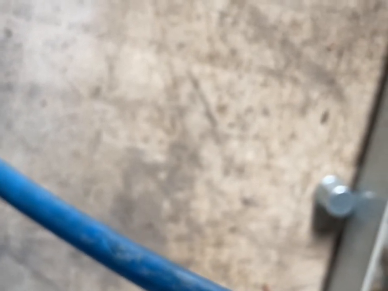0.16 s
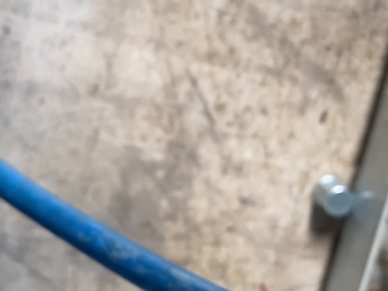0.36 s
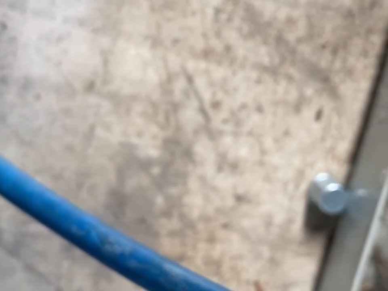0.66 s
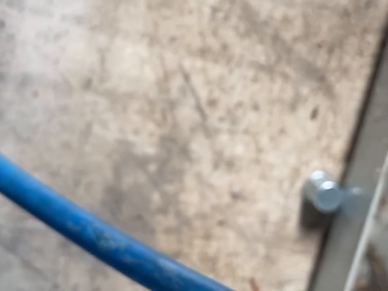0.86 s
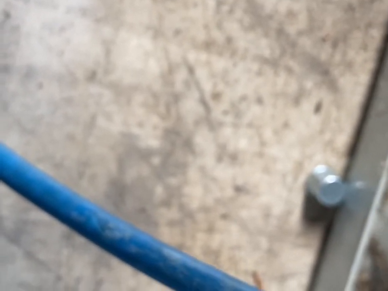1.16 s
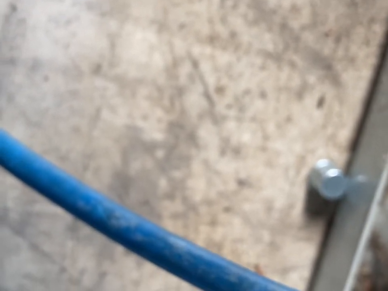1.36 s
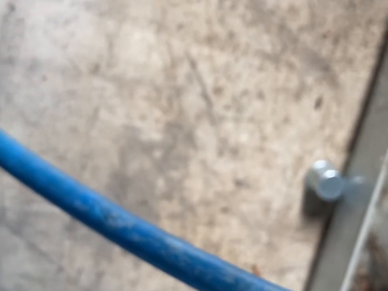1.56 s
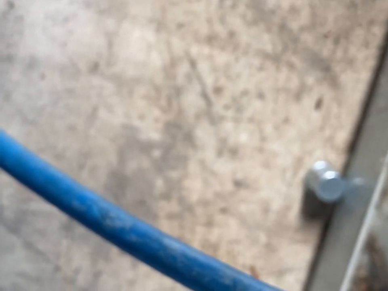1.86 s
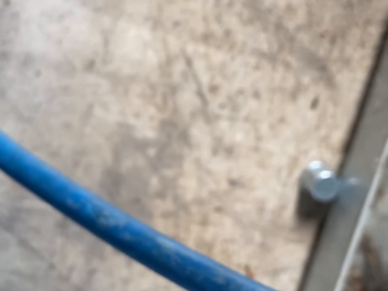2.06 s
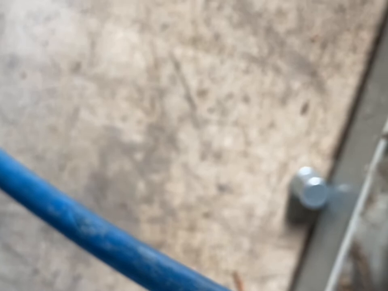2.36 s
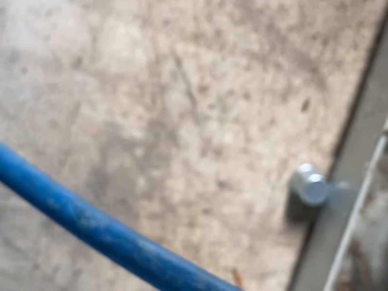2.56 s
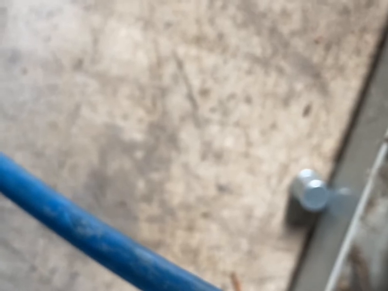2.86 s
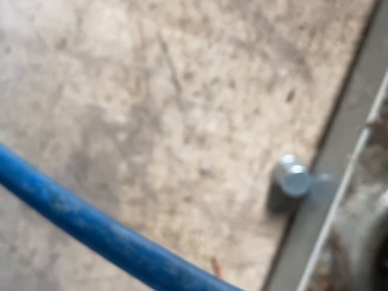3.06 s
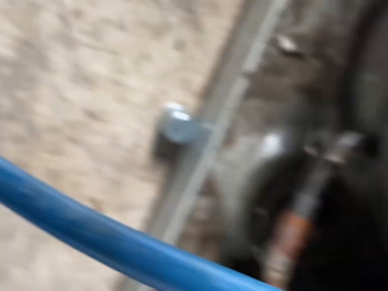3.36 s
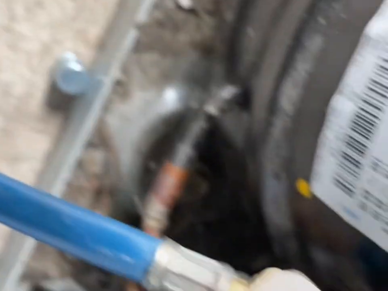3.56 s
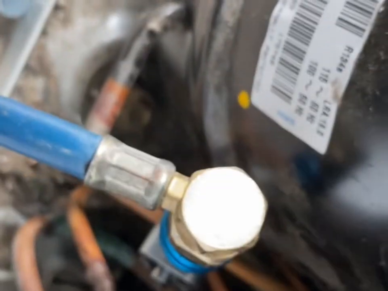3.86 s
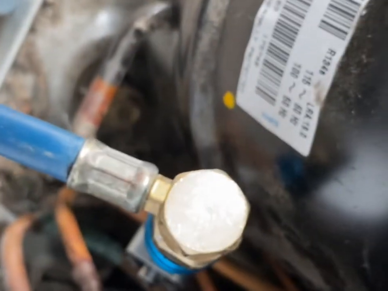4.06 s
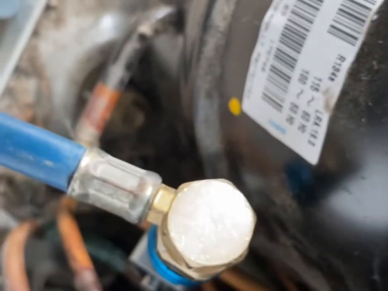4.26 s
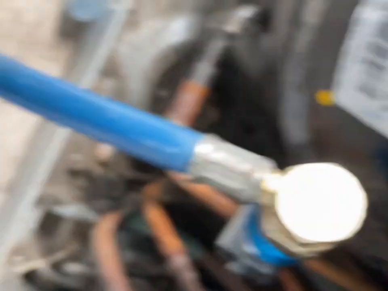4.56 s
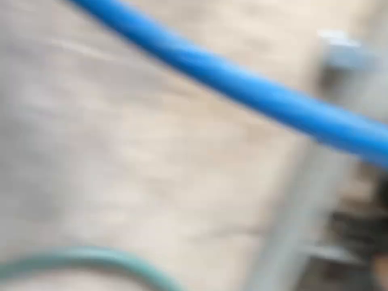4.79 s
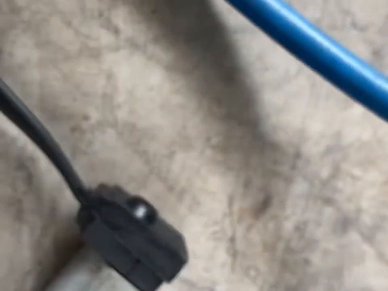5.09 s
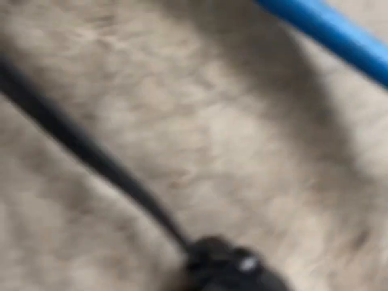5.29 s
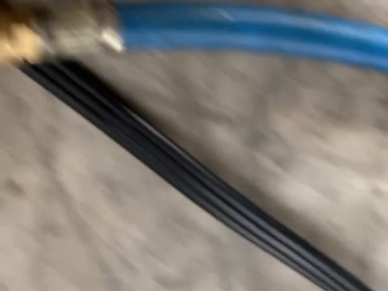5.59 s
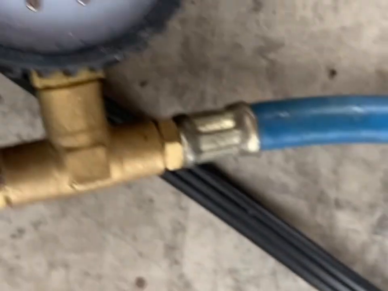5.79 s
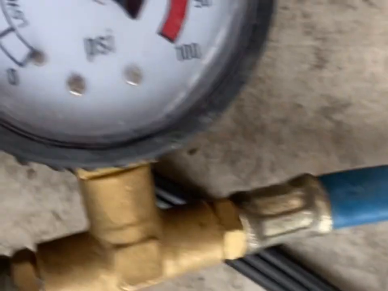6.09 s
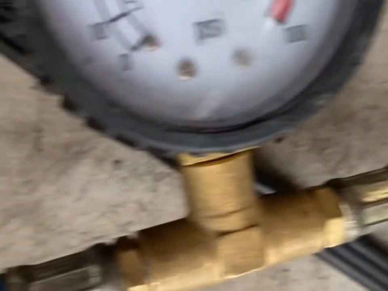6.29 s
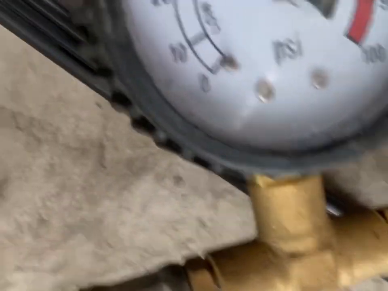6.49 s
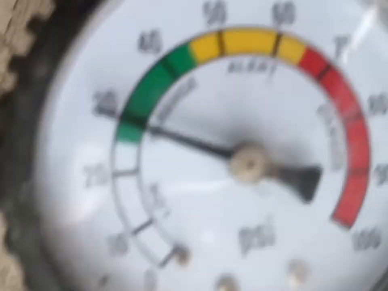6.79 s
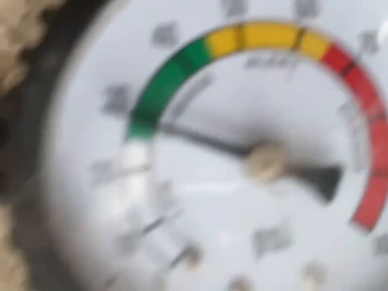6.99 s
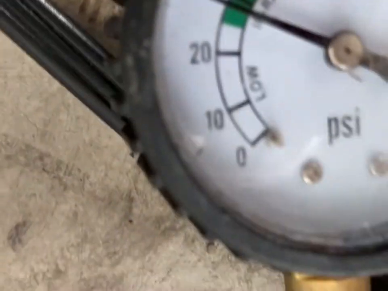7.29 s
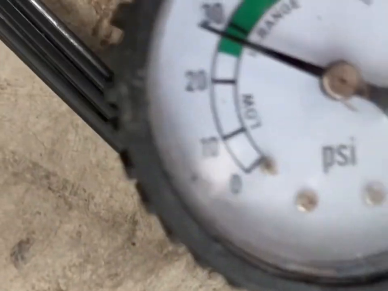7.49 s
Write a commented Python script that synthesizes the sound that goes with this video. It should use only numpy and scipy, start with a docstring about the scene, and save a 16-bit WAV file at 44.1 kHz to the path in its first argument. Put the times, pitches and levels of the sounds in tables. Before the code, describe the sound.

A low compressor hum holds throughout in a hard-floored indoor space, with whirring fan air and fine metallic rattle. Refrigerant rushes through a nearby hose with a high whistling edge, strongest at first. A short squeak is followed by a quiet fitting knock. The handheld microphone then moves away with a dull bump and clicks; thin metallic whistles flicker, hiss drops, and faint low draught brushes the microphone.

```python
"""A compressor drones and buzzes while refrigerant hisses in through a charging hose; a small fan whirs behind.
The drone is a shaft-rate sine; piston strokes ring steel resonances; the motor hum beats. Fan and gas are
coloured noise plus blurred tones or a singing band. A rub squeaks briefly and a fitting is tapped.
A hand-held camera moves from the hose past the compressor to the gauge; levels, ripples and draught follow tables."""
import sys
import numpy as np
from scipy import signal
from scipy.fft import rfft, irfft, next_fast_len
from scipy.io import wavfile
from scipy.ndimage import map_coordinates

SR = 44100
rng = np.random.default_rng(int(sys.argv[2]) if len(sys.argv) > 2 else 0)


def to_wav(s):
    """Save 16-bit WAV."""
    ch = np.atleast_2d(s).T  # columns
    pcm = np.round(np.clip(ch, -1, 1) * 32767)  # PCM
    wavfile.write(sys.argv[1], SR, pcm.astype(np.int16))


N = 336924
SHAFT_HZ = 59.69

# Likeness of the two microphone ports for low and mid sounds: (frequency [Hz], correlation [-1..1])
PORT_LIKENESS = [(60, 1), (250, 1), (450, 0.9), (700, 0.71), (1300, 1), (3000, 0.93), (9000, 1)]


def amp(db):
    """Decibels to gain."""
    return 10 ** (np.asarray(db) / 20)


def unit(x):
    """Scale to rms 1."""
    return x / np.sqrt(np.mean(x ** 2) + 1e-20)


def along(points, hz):
    """Interpolate (Hz, value) points on a log frequency axis."""
    f, v = np.transpose(points)
    return np.interp(np.log(hz + 1), np.log(np.abs(f) + 1), v)


def clock():
    """The time of every sample in seconds."""
    return np.arange(N) / SR


def curves(rows):
    """One value per sample for each column after the time."""
    s, *cols = np.transpose(rows)
    return [np.interp(clock(), s, c) for c in cols]


def wobble(rate_hz):
    """A smooth random curve through normal knots, rate_hz of them a second."""
    knots = rng.standard_normal(int(N * rate_hz / SR) + 4)
    return map_coordinates(knots, [clock() * rate_hz])


def filtered(x, response):
    """x times a complex response of frequency."""
    m = next_fast_len(N + SR // 2)
    spectrum = rfft(x, m) * response(np.fft.rfftfreq(m, 1 / SR))
    return irfft(spectrum, m)[..., :N]


def tone(hz, drift_rad):
    """A sine of rms 1 whose phase wanders slowly."""
    return np.sqrt(2) * np.sin(2 * np.pi * (hz * clock() + rng.random()) + drift_rad * wobble(1.95))


def blurred(hz, width_hz):
    """A tone of rms 1, part steady, part fluttering in strength and phase at about width_hz."""
    steady_share = .45  # of the power
    flutter = unit(wobble(width_hz)) + 1j * unit(wobble(width_hz))
    envelope = np.sqrt(steady_share) + np.sqrt((1 - steady_share) / 2) * flutter
    return unit(np.real(envelope * np.exp(2j * np.pi * hz * clock())))


def rush(spectrum, likeness):
    """Stereo noise of rms 1 with a given colour and left-right correlation."""
    def colour(hz):
        turn = np.arccos(np.clip(along(likeness, hz), -1, 1)) / 2
        return amp(along(spectrum, hz)) * [np.cos(turn), np.sin(turn)]
    mid, side = filtered(rng.standard_normal((2, N)), colour)
    return unit(np.array([mid + side, mid - side]))


def ring(x, modes):
    """x through parallel resonances of alternating sign, at rms 1."""
    def band(f, hz, width):
        return 1j * f * width / (hz * hz - f * f + 1j * f * width)

    def bank(f):
        return sum((-1) ** k * amp(db) * band(f, hz, width) for k, (hz, width, db) in enumerate(modes))
    return unit(filtered(x, bank))


def gate(start_s, length_s, attack_s, release_s):
    """An envelope that rises, holds until the length has passed, then falls."""
    t = clock() - start_s
    return np.clip(t / attack_s, 0, 1) * np.clip(1 - (t - length_s) / release_s, 0, 1)


def level(near_db, far_db):
    """A source's level in dB as the camera moves from the cabinet to the gauge."""
    # Camera path: (time [s], place [0 beside the cabinet .. 1 beside the gauge])
    camera = [(0, 0.083), (3, 0.17), (3.6, 0.027), (4.6, 0.037), (5.2, 0.72), (6.9, 1), (7.64, 0.9)]
    away, = curves(camera)
    return near_db + (far_db - near_db) * away


def rippled(x, depth_db, spacing_hz, glide_hz, size):
    """Reflections from floor and cabinet: spectral peaks and dips that change and slide upward."""
    # Pace of the ripples as the hand moves: (time [s], rate [changes/s])
    ripple_rate = [(0, .4), (3, .5), (3.4, 3), (4.5, 2), (4.8, 5), (7.64, 4)]
    hz, t, z = signal.stft(x, SR, nperseg=size)
    travel = np.cumsum(np.interp(t, *np.transpose(ripple_rate))) * t[1]
    place = np.broadcast_arrays((hz[:, None] - glide_hz * travel) / spacing_hz, travel)
    field = map_coordinates(rng.standard_normal((256, 64)), place, mode="mirror")
    gain = unit(amp(depth_db * unit(field)))
    return signal.istft(z * gain, SR, nperseg=size)[1][..., :N]


def draught():
    """Air brushing each port: faint low noise, nearly unrelated left and right."""
    # Draught level: (time [s], level [dB])
    draught_level = [(4.5, -91), (4.7, -66), (5.5, -55), (6.5, -59.5), (7.1, -46.5), (7.64, -52)]
    # Draught spectrum: (frequency [Hz], relative density [dB/Hz])
    draught_colour = [(15, -15), (35, -3.5), (70, -6), (110, -4), (180, -11), (300, -30), (700, -66)]
    db, = curves(draught_level)
    return amp(db + 2 * wobble(8.7)) * rush(draught_colour, [(100, 0.0056)])


def blade_tones():
    """Tones of the fan and its motor, blurred by turbulent air."""
    # Fan tones: (frequency [Hz], width [Hz], level beside cabinet [dB], level beside gauge [dB])
    fan_tones = [(151.1, 14, -54.5, -62), (199.7, 17, -53.5, -63), (217, 18, -56, -64),
                 (260.5, 5, -58.5, -55), (286.3, 16, -64.5, -65), (356.6, 18, -76, -60.5),
                 (384.6, 16, -66, -66.5), (403.3, 10, -58, -68.5), (436, 16, -64, -67), (454, 24, -63, -77),
                 (582.5, 18, -69.5, -67.5), (631, 24, -74, -69)]
    return sum(amp(level(near, far)) * blurred(hz, width) for hz, width, near, far in fan_tones)


def standing_tones():
    """Two tones that swell and fade as the camera crosses the room's standing waves."""
    # Standing-wave levels: (time [s], low tone [dB], high tone [dB])
    standing = [(0, -51, -67), (.45, -56, -67), (.7, -47.5, -67), (1.4, -46.5, -66), (1.65, -51, -67),
                (2.1, -47, -66), (2.8, -50, -65), (3.4, -47, -62), (4, -47.5, -61), (4.65, -46, -62),
                (4.85, -47, -72), (5.2, -55, -73), (5.6, -58, -63), (6.4, -59, -65.5), (6.8, -54, -60),
                (7.2, -55, -66), (7.64, -55, -66)]
    low_db, high_db = curves(standing)
    low = amp(low_db + 1.8 * wobble(16)) * tone(175.6, drift_rad=.5)
    return low + amp(high_db) * blurred(604, width_hz=24)


def cabinet_boom():
    """The cabinet booms near 180 Hz: noise passed twice through one resonance."""
    # Cabinet resonance: (frequency [Hz], width [Hz], relative level [dB])
    cabinet = [(177, 40, 0)]
    # Boom level: (time [s], level [dB])
    boom = [(0, -51), (.4, -56), (.6, -48), (1.45, -48.5), (1.65, -54), (1.85, -47.5), (2.2, -45),
            (2.35, -52), (3.25, -50.5), (3.5, -45), (3.8, -50), (4.35, -48), (4.75, -50), (5.1, -62),
            (7.64, -62)]
    db, = curves(boom)
    return amp(db) * ring(ring(rng.standard_normal(N), cabinet), cabinet)


def fan_air():
    """Air noise: low rumble, direct whir and its spread through the room."""
    # Spectra of rumble, whir and room sound, each: (frequency [Hz], relative density [dB/Hz])
    rumble_colour = [(15, -4), (30, -32), (52, 2.5), (80, 2), (125, -6.5), (185, -4), (230, -8), (300, -15),
                     (600, -48.5)]
    whir_colour = [(120, -26), (280, -2.5), (345, -4.5), (440, 0.5), (540, -2), (620, -8), (710, -9.5),
                   (930, -8.5), (1150, -14.5), (1600, -17), (2400, -18.5), (4500, -20), (9000, -48),
                   (16000, -24.5)]
    room_colour = [(25, -5), (70, 13), (140, 1.5), (220, -8.5), (350, 0.5), (500, -7), (610, -5), (720, -8),
                   (950, -9.5), (1300, -15), (1700, -18), (2300, -22.5), (6000, -21.5), (16000, -18)]
    # Likeness of the room sound at the ports: (frequency [Hz], correlation [-1..1])
    diffuse = [(60, 1), (250, 0.98), (550, 0.52), (850, -0.15), (1350, -0.38), (1900, -0.0016), (6000, 1)]
    # Air levels: (time [s], direct whir [dB], room sound [dB])
    air_levels = [(0, -50, -58), (1.5, -50.5, -55.5), (2.1, -51, -52.5), (3.4, -50, -55.5),
                  (3.85, -50.5, -54), (4.65, -51, -53), (4.9, -52, -49), (5.55, -55, -45.5),
                  (5.95, -54, -45.5), (7.1, -60, -45), (7.64, -51.5, -45.5)]
    whir_db, room_db = curves(air_levels)
    rumble_db = level(near_db=-42.0, far_db=-45.0) + 0.4 * wobble(7.8)
    rumble = amp(rumble_db) * rush(rumble_colour, PORT_LIKENESS)
    whir = amp(whir_db + 0.8 * wobble(7)) * rush(whir_colour, PORT_LIKENESS)
    room = amp(room_db) * rush(room_colour, diffuse)
    return rumble + rippled(whir + room, depth_db=2.2, spacing_hz=24, glide_hz=22, size=4096)


def fan():
    """Fluttering tones over rushing air; the boom fades late on as the room sound rises."""
    return blade_tones() + standing_tones() + cabinet_boom() + fan_air()


def click(start_s, db):
    """A dry contact: a burst of mid-range noise that dies at once."""
    decay_s = .012
    t = clock() - start_s
    colour = [(300, -20), (900, -2), (1700, 0), (4500, -5), (6500, -14), (9000, -50)]
    return amp(db) * (t > 0) * np.exp(-np.abs(t) / decay_s) * rush(colour, [(1000, 0.93)])


def handling():
    """Dull scuffs (noise swells) and light clicks as the hose and gauge are handled."""
    # Scuffs: (centre time [s], 1/e half-length [s], level [dB], spectral peak [Hz])
    scuff_rows = [(4.615, .02, -42, 130), (4.64, 0.036, -61, 900), (7.295, 0.05, -61.5, 1700),
                  (7.275, .025, -57, 500), (7.445, .012, -64, 1800)]
    # Clicks and creaks: (time [s], onset level [dB])
    ticks = [(4.5, -57), (4.583, -58), (4.705, -57), (4.99, -54), (5.598, -57), (6.56, -58), (7.255, -62)]

    def scuff(s, length_s, db, hz):
        swell = np.exp(-((clock() - s) / length_s) ** 2)
        colour = [(hz / 4, -18), (hz, 0), (hz * 2, -13), (hz * 6, -36), (hz * 20, -80)]
        return amp(db + 1.8 * wobble(150)) * swell * rush(colour, PORT_LIKENESS)
    return sum(scuff(*row) for row in scuff_rows) + sum(click(s, db) for s, db in ticks)


def tap(start_s, db, attack_s, crack_db):
    """A soft knock cracks against a hose fitting and rings its decaying modes."""
    # Fitting modes: (frequency [Hz], relative level [dB], 60 dB decay time [s])
    fitting = [(740, -3, .15), (1224, 2, 0.21), (1310, -2, .05), (1400, -2.5, .25), (1700, -2, .04),
               (2200, -14, 0.17), (2600, -2, 0.066), (2864, -14, .15), (3880, -8, .06)]
    t = np.maximum(clock() - start_s, 0)
    modes = sum(amp(mode_db - 60 * t / t60_s) * np.sin(2 * np.pi * hz * t + .5 * wobble(120))
                for hz, mode_db, t60_s in fitting)
    return amp(db) * (1 - np.exp(-t / attack_s)) * modes + click(start_s, crack_db)


def squeak():
    """A rub catches three times: a shaky tone with a weak octave, broken each time the grip slips."""
    # Catches: (time [s], length [s], mean pitch [Hz], peak level [dB], octave re fundamental [dB])
    catches = [(2.06, .044, 918, -49.5, -26), (2.106, .034, 908, -52.7, -21),
               (2.139, .036, 920, -51.2, -14)]

    def catch(s, length_s, hz, db, octave_db):
        phase = 2 * np.pi * np.cumsum(hz * (1 + .007 * wobble(160))) / SR
        wave = np.sin(phase) + amp(octave_db) * np.sin(2 * phase)
        envelope = gate(s, length_s, attack_s=.008, release_s=.012)
        return envelope * amp(db + 1.2 * wobble(130)) * wave
    return sum(catch(*row) for row in catches)


def singing():
    """A narrow band of valve turbulence, drifting in pitch: low noise shifted up by a carrier."""
    # Singing band: (time [s], centre [Hz], level [dB])
    singing_band = [(0, 12950, -44.5), (.3, 12920, -49.5), (.8, 12900, -59), (3.0, 12800, -63),
                    (3.55, 12850, -62), (3.7, 13500, -57), (4.6, 13480, -55), (4.75, 13600, -64),
                    (5.0, 13600, -63), (5.25, 13900, -59), (5.6, 14100, -70), (7.64, 13500, -72)]
    centre_hz, db = curves(singing_band)
    phase = 2 * np.pi * np.cumsum(centre_hz) / SR
    skirt = [(150, -3.5), (350, -7), (700, -9), (1500, -36), (3000, -120)]
    band = sum(rush(skirt, [(100, 0.87)]) * wave(phase) for wave in (np.cos, np.sin))
    return amp(db + .8 * wobble(7.4)) * band


def bore_spectrum():
    """Resonant peaks of the valve's bore over a noise floor, as (Hz, dB per Hz) points."""
    # Bore resonances: (frequency [Hz], 1/e half-width of power [Hz], relative level [dB])
    bore_modes = [(6500, 330, -5), (7191, 181, -1), (7780, 235, -1), (8599, 350, -1), (9143, 106, 0),
                  (9512, 290, -1), (10419, 202, -3), (11086, 165, -1), (11650, 300, -8), (12248, 131, -6),
                  (12859, 450, -1), (14566, 300, -7), (15269, 327, 0), (15680, 110, 0)]
    # Noise between them: (frequency [Hz], relative density [dB/Hz])
    bore_floor = [(1500, -28), (3700, -14.5), (5000, -9), (5900, -10), (9000, -8.5), (14000, -8.5),
                  (15800, -9), (16500, -60)]
    hz = np.geomspace(1000, SR / 2, 900)
    peaks = sum(amp(db) ** 2 * np.exp(-((hz - centre) / width) ** 2) for centre, width, db in bore_modes)
    return np.column_stack([hz, 10 * np.log10(peaks + amp(along(bore_floor, hz)) ** 2)])


def refrigerant():
    """Near the hose the bore colours the hiss; farther off a plain rush, fizz and room echo remain."""
    # Gas levels: (time [s], bore [dB], plain hiss [dB], top fizz [dB], room echo [dB])
    gas = [(0.0, -40.5, -44, -70, -66), (0.15, -42.5, -48, -70, -66), (0.8, -45, -52, -70, -64),
           (1.5, -45.5, -56, -68, -62), (2.6, -46, -55, -61, -60), (3.1, -47, -51.5, -58, -59),
           (3.4, -51, -47.5, -56, -58), (3.8, -58, -46.5, -59, -59), (4.55, -64, -47, -63, -60),
           (4.72, -64, -51, -58, -59), (4.9, -68, -54, -50.5, -55), (5.2, -62, -54, -52.5, -59),
           (5.65, -66, -64, -63, -56), (6.4, -75, -72, -70, -56.5), (6.9, -68, -75, -66, -61),
           (7.64, -70, -63, -63, -65)]
    # Spectra of hiss, fizz and echo, each: (frequency [Hz], relative density [dB/Hz])
    hiss_colour = [(1500, -25), (3700, -14), (5000, -9), (6000, -5), (7000, 0), (7900, 0), (9400, 0),
                   (10300, -2), (11500, -5), (12500, -4), (14200, -1.5), (15800, 1), (16500, -60)]
    fizz_colour = [(9000, -35), (12500, -16), (13500, -6), (14300, -4), (15200, 0), (15800, 1),
                   (16300, -60)]
    echo_colour = [(3000, -12), (5000, -5), (6100, 1.5), (7000, -4), (7900, 0), (9400, -.5), (10300, 0),
                   (11500, -2.5), (12700, 0), (14200, -2), (15700, 2.5), (16300, -60)]
    # Likeness of the hiss at the ports: (frequency [Hz], correlation [-1..1])
    direct = [(5000, .97), (6500, .78), (7100, .998), (8800, .998), (10500, .75), (12000, .998),
              (13800, .998), (15000, .75)]
    bore_db, hiss_db, fizz_db, echo_db = curves(gas)
    near = amp(bore_db) * rush(bore_spectrum(), direct) + singing()
    parts = [(hiss_db, hiss_colour), (fizz_db, fizz_colour), (echo_db, echo_colour)]
    far = sum(amp(db) * rush(colour, direct) for db, colour in parts)
    swept = rippled(far, depth_db=1.4, spacing_hz=420, glide_hz=400, size=1024)
    both = rippled(near + swept, depth_db=1.7, spacing_hz=110, glide_hz=60, size=2048)
    return both * amp(.35 * wobble(20))


def motor_hum(drift_rad):
    """Rotor slip sets the shaft orders just below the mains orders, so the hum beats slowly."""
    mains_hz, in_step_s = 59.99, 3.98  # in_step_s: a crest of the beat
    # Hum orders beside the cabinet: (multiple, mains order [dB], shaft order [dB])
    magnetic = [(2, -56.5, -67), (4, -53, -59)]

    def order(hz):
        return np.sqrt(2) * np.sin(2 * np.pi * hz * (clock() - in_step_s) + drift_rad * wobble(1.72))
    hum = sum(amp(mains_db) * order(k * mains_hz) + amp(shaft_db) * order(k * SHAFT_HZ)
              for k, mains_db, shaft_db in magnetic)
    return amp(level(near_db=0, far_db=-4.5)) * hum


def strokes(rough, scatter_db, puff_turns):
    """One valve slap and one decaying puff of turbulent gas per shaft turn, spread by the steel."""
    turns = SHAFT_HZ * clock() + 0.0018 * wobble(3.06)
    slap = np.sinc((turns - np.round(turns)) * SR / SHAFT_HZ / 2) * amp(scatter_db * wobble(40))
    puff = np.exp(-(turns % 1) / puff_turns) * rush([(1000, 0)], [(1000, 0.52)])

    def steel(hz):
        colour = amp(along([(800, -25), (2500, 12.0), (6000, 15.5), (9000, -41.0)], hz))
        # bending waves travel faster the higher they are, which spreads each slap in time
        return colour * np.exp(-2j * np.pi * 2.5 * np.sqrt(hz))
    return filtered(unit(slap) + rough * unit(puff), steel)


def shell_buzz():
    """Strokes ring the steel shell: a broad buzz plus a beamed pair of resonances near 3.2 kHz."""
    # Shell resonances: (frequency [Hz], width [Hz], relative level [dB])
    shell = [(2070, 40, -13), (2334, 30, -11), (2770, 30, -8), (2840, 36, -4), (2880, 30, -7),
             (3035, 45, -9), (3470, 60, -13.5), (4010, 43, -8.5), (4144, 40, -6.5), (4725, 44, -4.5),
             (4930, 45, -6), (4970, 43, -5), (5300, 47, -5), (5630, 50, -3)]
    # Level of the 3.2 kHz pair: (time [s], level [dB])
    middle_ring = [(0.0, -65), (3.53, -64.5), (3.76, -76), (4.2, -68), (5.04, -71), (5.45, -68), (5.7, -73),
                   (7.21, -76), (7.64, -67)]
    middle_db, = curves(middle_ring)
    drive = strokes(rough=1.55, scatter_db=3.5, puff_turns=0.7)
    buzz_db = level(near_db=-57.3, far_db=-66.5) + 0.5 * wobble(10)
    middle = amp(middle_db + 1.0 * wobble(6.6)) * ring(drive, [(3230, 37, 1), (3287, 27, -3.5)])
    return amp(buzz_db) * ring(drive, shell) + middle


def shell_lower_ring():
    """Rougher strokes ring narrowly beamed shell resonances near 3 kHz."""
    # Lower-group level: (time [s], level [dB])
    lower_ring = [(0, -68), (4.35, -70), (4.7, -63.5), (5.0, -65), (5.25, -62), (5.6, -64), (6, -66),
                  (7.64, -67)]
    # Lower-group resonances: (frequency [Hz], width [Hz], relative level [dB])
    lower_modes = [(2767, 50, -5.5), (2872, 38, -0.5), (2985, 30, 1.5), (3010, 35, 0)]
    db, = curves(lower_ring)
    drive = strokes(rough=3.8, scatter_db=2.5, puff_turns=1.4)
    return amp(db + 2.2 * wobble(17)) * ring(drive, lower_modes)


def shell_upper_ring():
    """Three shell resonances near 5.7 kHz take turns facing the camera, by a power crossfade."""
    modes_hz, width_hz = [5610, 5760, 5960], 190
    # Upper-group course: (time [s], level [dB], strongest pitch [Hz])
    upper_ring = [(0, -59, 5640), (.6, -57.5, 5660), (1, -60, 5660), (3.1, -61, 5660), (3.6, -62, 5950),
                  (4.6, -61.5, 5950), (4.85, -64, 5780), (5.08, -60, 5660), (5.23, -74, 5650),
                  (5.46, -57.5, 5630), (5.64, -72, 5650), (5.86, -70, 5650), (5.96, -58, 5700),
                  (6.25, -59, 5820), (6.55, -65, 5750), (6.9, -63, 5870), (7.1, -70, 5780),
                  (7.64, -63, 5650)]
    db, strongest_hz = curves(upper_ring)
    slaps = strokes(rough=1.8, scatter_db=3.5, puff_turns=.6)

    def steep(hz):
        mode = [(hz, width_hz, 0)]
        return ring(ring(slaps, mode), mode)
    blend = sum(np.sqrt(np.interp(strongest_hz, modes_hz, share)) * steep(hz)
                for hz, share in zip(modes_hz, np.eye(len(modes_hz))))
    return amp(db + 1.6 * wobble(10)) * blend


def clinks_and_whistles():
    """Now and then the shell clinks briefly or whistles at a multiple of the shaft rate."""
    pulsing_depth = .3  # at the stroke rate
    # Clinks (first two rows) and whistles:
    # (time [s], length [s], level before pulsing [dB], multiple of the shaft rate)
    shell_notes = [(4.575, .018, -57, 48), (4.7, .02, -57, 50), (4.84, .12, -66, 50),
                   (5.035, .062, -56, 50), (5.13, .058, -56.5, 50), (5.215, .16, -62, 50),
                   (5.38, .085, -59.5, 50), (5.48, .08, -60, 50), (5.58, .2, -66, 50),
                   (6.21, .028, -60, 48), (7.08, .08, -66, 48)]

    def note(s, length_s, db, k):
        envelope = gate(s, length_s, attack_s=0.017, release_s=0.016)
        return amp(db + 1.2 * wobble(40)) * envelope * tone(k * SHAFT_HZ, drift_rad=.3)
    pulsing = 1 + pulsing_depth * np.cos(2 * np.pi * SHAFT_HZ * clock() + wobble(11))
    return pulsing * sum(note(*row) for row in shell_notes)


def compressor():
    """The shell rocks at the shaft rate, the motor hums, and each stroke rings the steel."""
    drone_db = level(near_db=-27.8, far_db=-29.5) + 0.058 * wobble(11)
    drone = amp(drone_db) * tone(SHAFT_HZ, drift_rad=0.022)
    steel = shell_buzz() + shell_lower_ring() + shell_upper_ring() + clinks_and_whistles()
    return drone + motor_hum(drift_rad=0.064) + steel


def scene():
    """All sources as they reach the two microphone ports."""
    knock = tap(start_s=4.087, db=-48.5, attack_s=0.004, crack_db=-55)
    return draught() + fan() + handling() + knock + squeak() + refrigerant() + compressor()


def record(dry):
    """The left and right channels shift the treble against each other, the ports differ in the mids; a band
    limit cuts the top."""
    top_hz = 15780
    # Phase between the channels: (frequency [Hz], lead of left over right [rad])
    channel_phase = [(60, 0), (400, 0), (2000, -.15), (5150, -.15), (5950, -1.5), (7000, -3.1), (8900, -3.2),
                     (11750, -2 * np.pi), (14100, -2 * np.pi), (15700, -8.5)]
    # Port balance: (frequency [Hz], left minus right [dB])
    port_balance = [(480, 0), (680, -2.6), (1050, 0)]

    def ports(hz):
        phase = np.exp(.5j * np.outer([1, -1], along(channel_phase, hz)))
        balance = amp(np.outer([.5, -.5], along(port_balance, hz)))
        return phase * balance * (hz < top_hz)
    return filtered(dry, ports)


dry = scene()
out = record(dry)
to_wav(out)
```